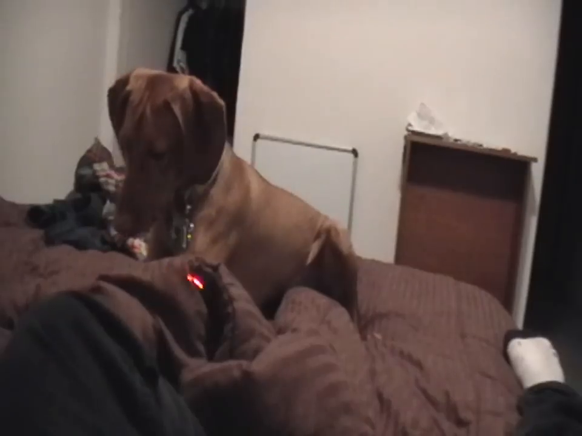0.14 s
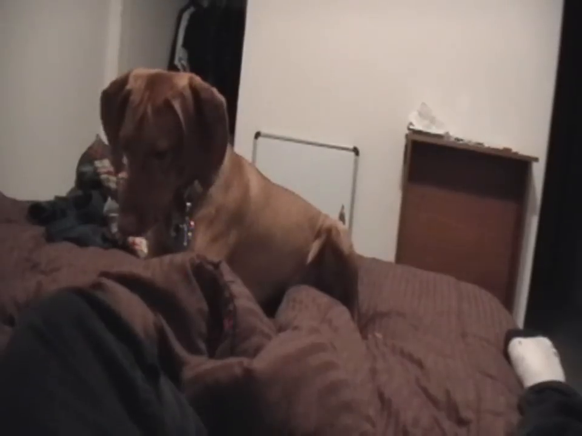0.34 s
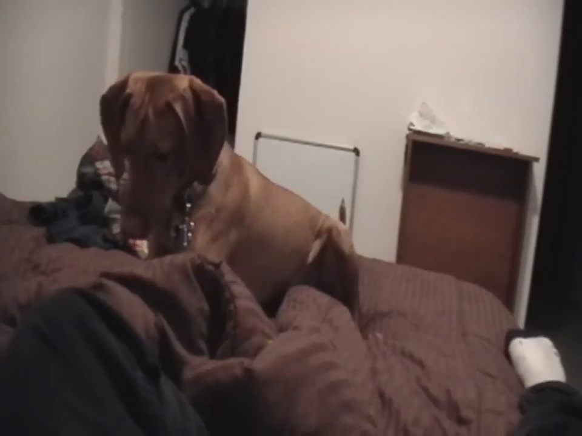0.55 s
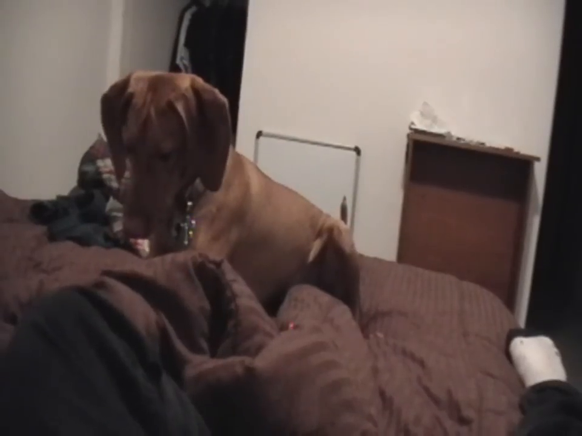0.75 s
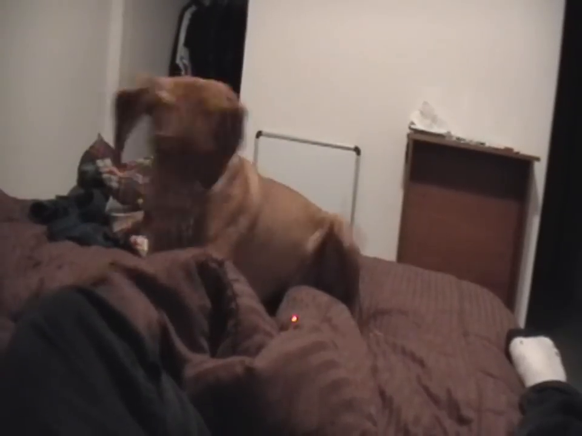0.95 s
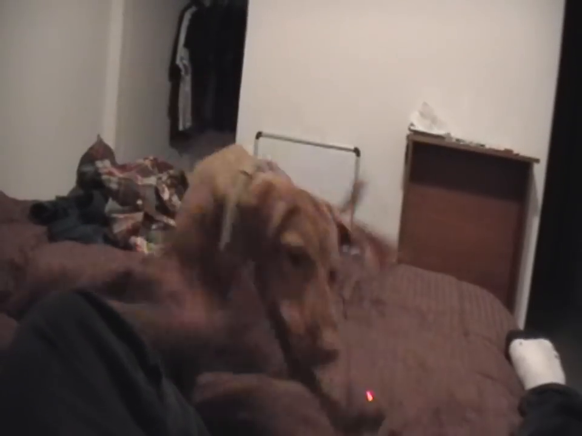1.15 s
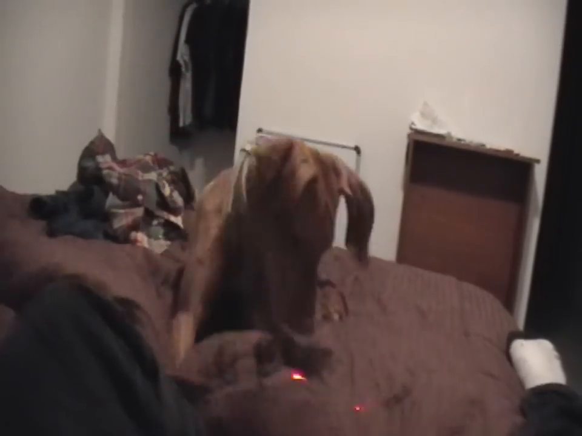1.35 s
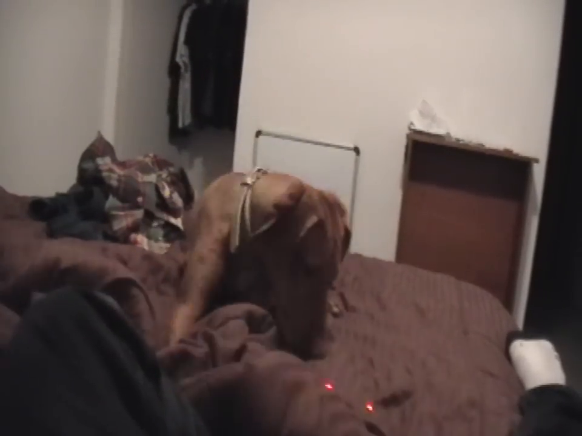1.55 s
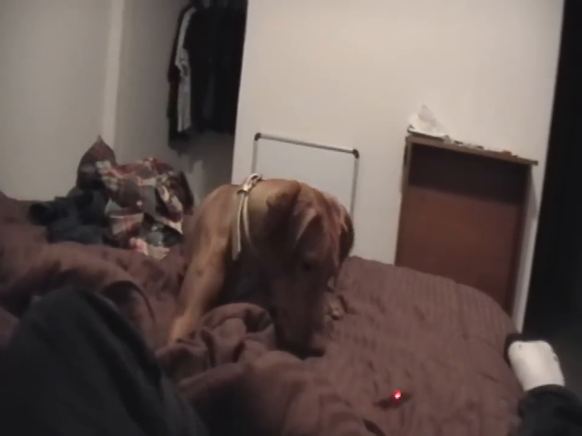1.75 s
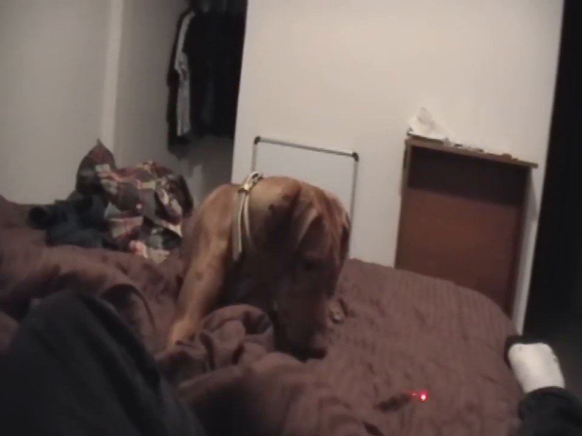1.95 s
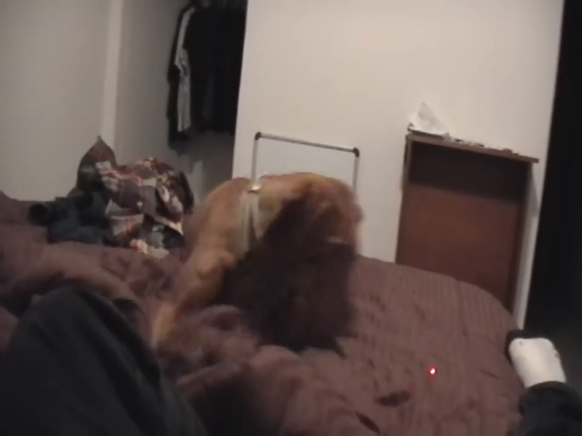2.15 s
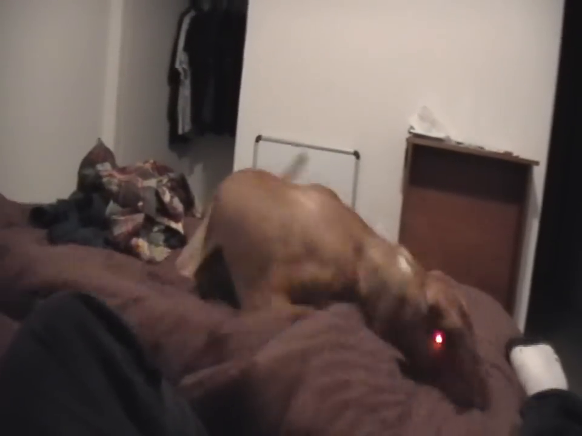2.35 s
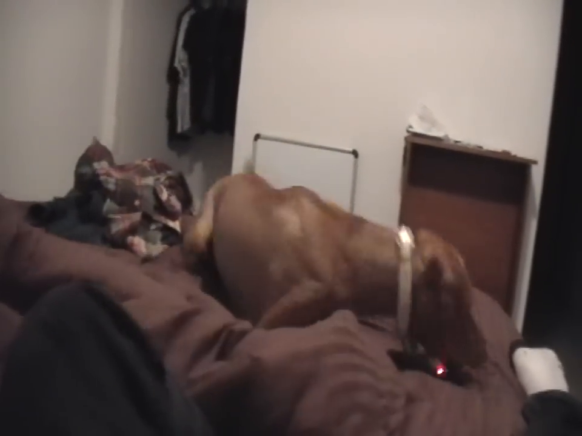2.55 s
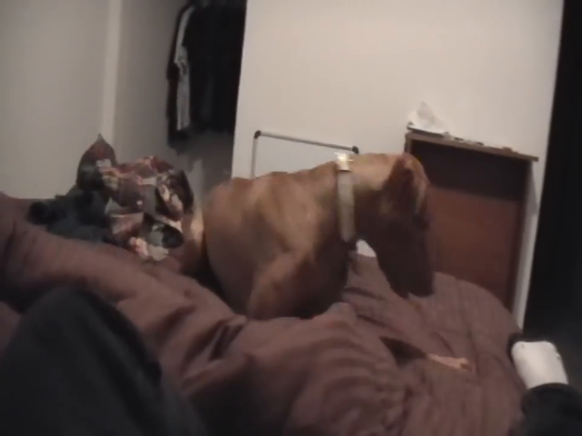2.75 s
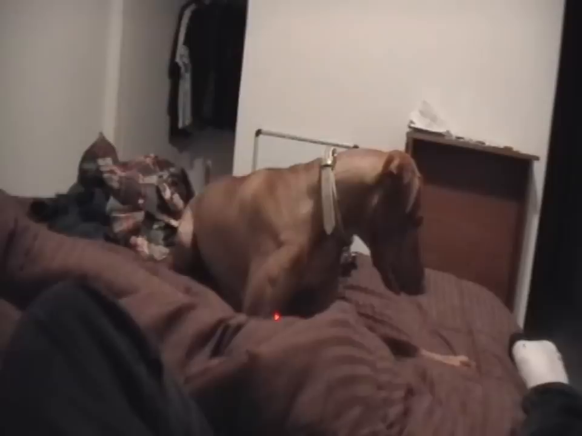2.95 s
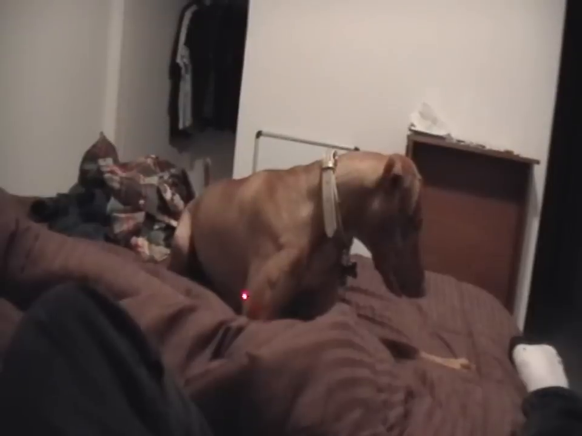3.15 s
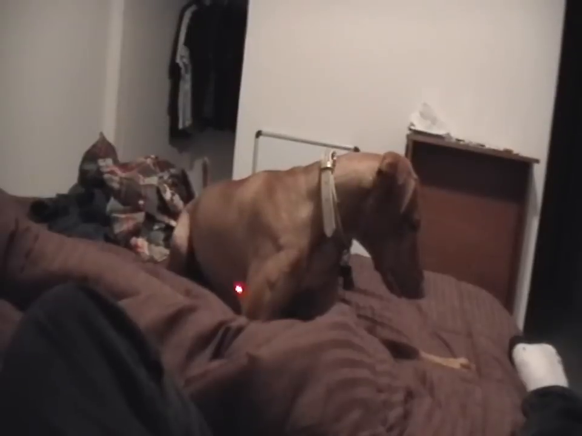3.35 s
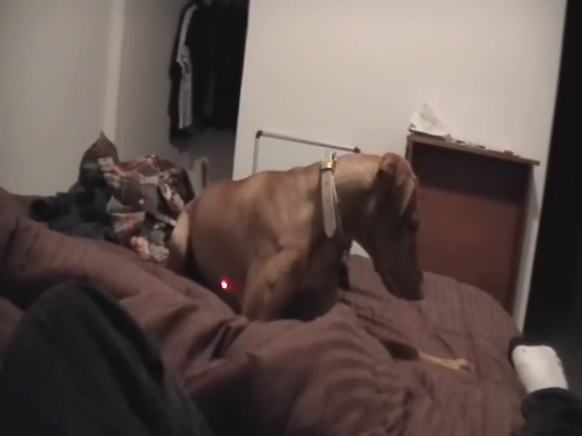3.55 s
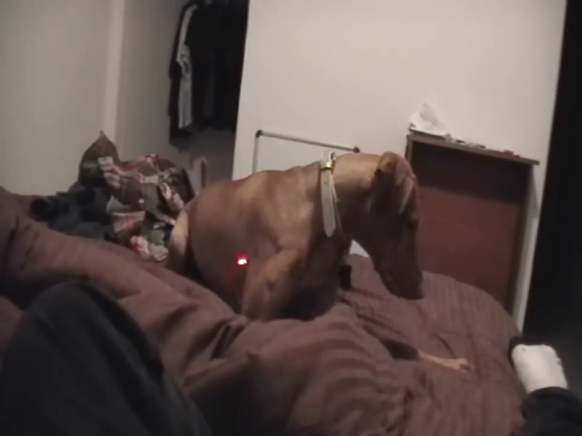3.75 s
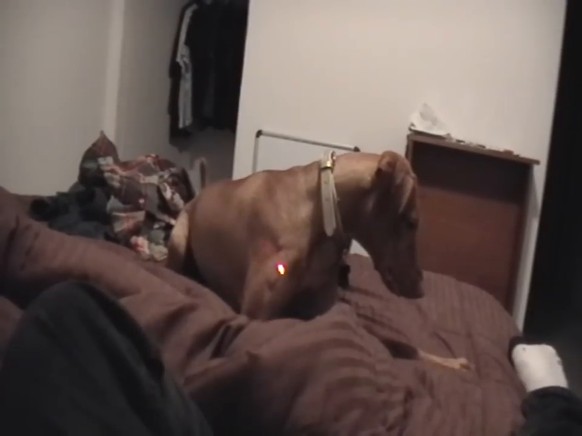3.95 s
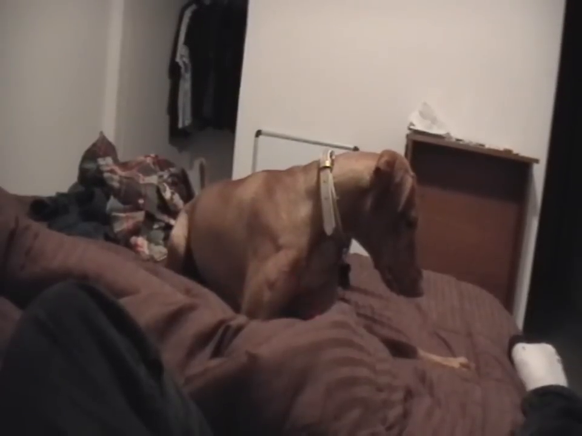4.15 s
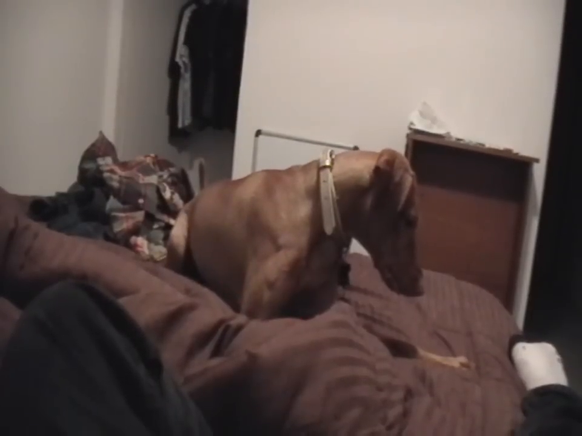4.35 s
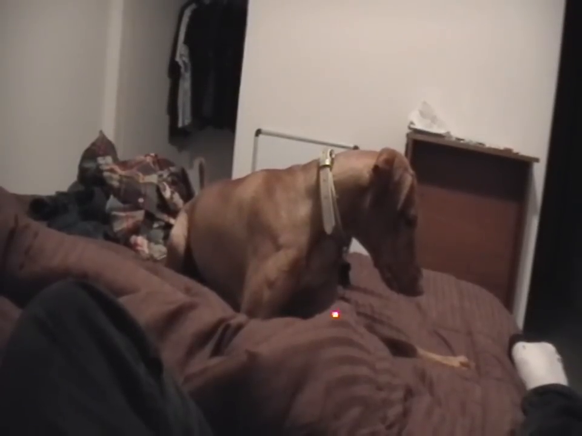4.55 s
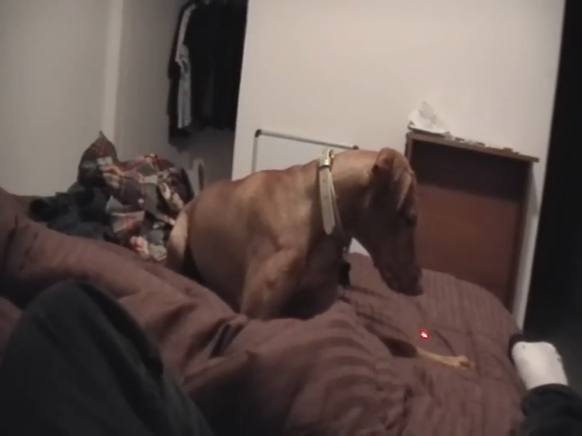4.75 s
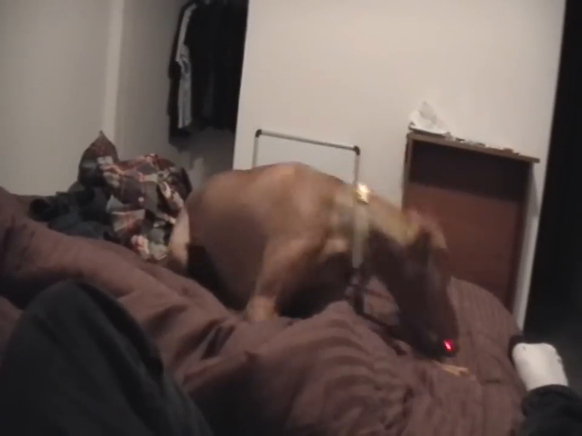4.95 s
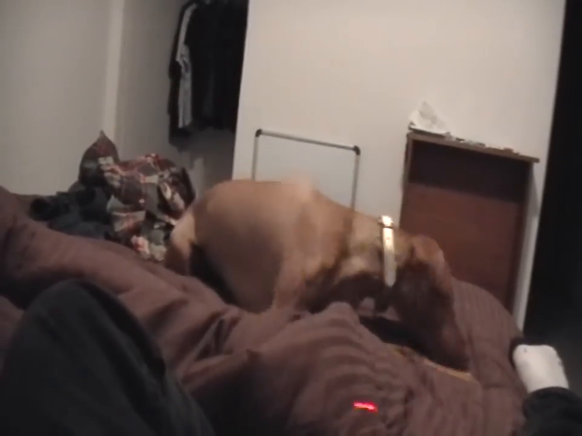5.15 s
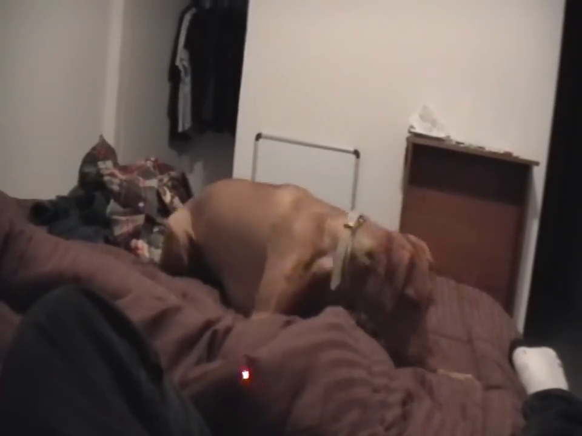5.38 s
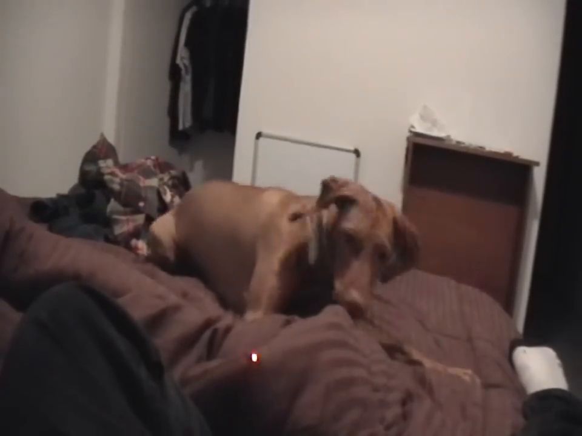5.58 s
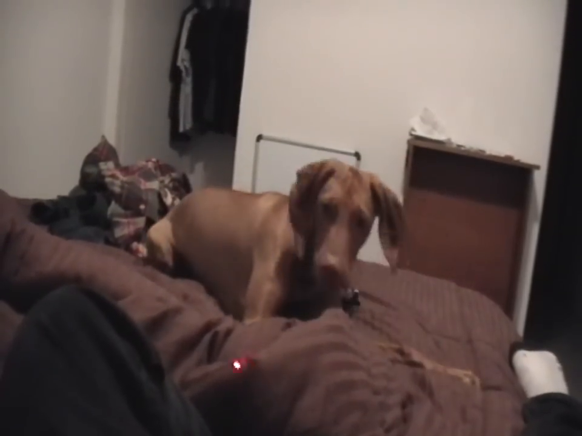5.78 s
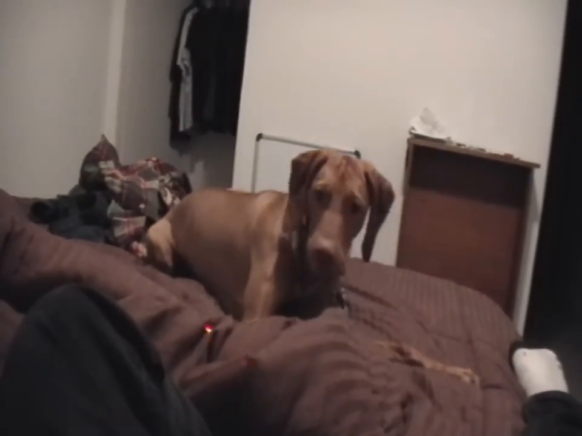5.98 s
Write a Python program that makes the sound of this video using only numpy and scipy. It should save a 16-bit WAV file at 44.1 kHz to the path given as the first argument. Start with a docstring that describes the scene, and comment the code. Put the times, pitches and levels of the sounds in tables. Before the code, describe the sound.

A dog's collar tags clink and chatter on and off over paw pats, duvet rustle and dull mattress thumps in a quiet bedroom.

```python
"""Two metal tags on a puppy's collar clash and chatter against their ring in short bursts.
Each hit makes a sharp click and leaves the tags ringing for a moment.
She is pouncing about on a bed in a small bedroom: her paws pat the duvet, the cloth rustles,
the mattress thuds and the bed rumbles, all over faint room noise and a steady hum.
At the very start comes a short hollow rush, then the sound drops out for an instant."""
import sys
import numpy as np
from scipy import signal
from scipy.fft import rfft, irfft, next_fast_len
from scipy.io import wavfile
from scipy.ndimage import uniform_filter1d

SR = 44100
rng = np.random.default_rng(int(sys.argv[2]) if len(sys.argv) > 2 else 0)


def transcribe(signal):
    """Save signal, clipped to [-1, 1], as a 16-bit WAV file at the path in sys.argv[1]."""
    frames = np.atleast_2d(signal).T
    limited = np.clip(frames, -1, 1)
    pcm = np.round(limited * 32767).astype(np.int16)
    wavfile.write(sys.argv[1], SR, pcm)


N = 265437  # about 6 seconds


def amp(db):
    """Turn decibels into a number to multiply by."""
    return 10 ** (np.asarray(db) / 20)


def unit(x):
    """Scale a sound to an average (rms) level of 1."""
    return x / np.sqrt(np.mean(x ** 2) + 1e-20)


def along(points, hz):
    """Read between (Hz, value) points on a logarithmic pitch scale."""
    point_hz, values = np.transpose(points)
    return np.interp(np.log(hz + 1), np.log(point_hz + 1), values)


def seconds(size):
    """The time of each sample."""
    return np.arange(size) / SR


def fade(t, t60):
    """Die away by 60 dB in t60 seconds, the fade time."""
    return amp(-60 * t / t60)


def add(track, start, sound):
    """Mix a sound into a track at a start time in seconds."""
    part = track[..., max(round(start * SR), 0):][..., :sound.shape[-1]]
    part += sound[..., :part.shape[-1]]


def filtered(x, response):
    """Turn each frequency up or down by response(hz)."""
    size = x.shape[-1]
    padded = next_fast_len(size + 2048)
    return irfft(rfft(x, padded) * response(np.fft.rfftfreq(padded, 1 / SR)), padded)[..., :size]


def coloured(x, colour, size=2048):
    """Give a sound a tone colour without smearing it back in time."""
    gains = amp(along(colour, np.fft.rfftfreq(size, 1 / SR)))
    cepstrum = irfft(np.log(gains + 1e-6))
    cepstrum[1:size // 2] *= 2  # move the filter's response to after the hit
    cepstrum[size // 2 + 1:] = 0
    response = irfft(np.exp(rfft(cepstrum)))
    return signal.fftconvolve(x, response / np.linalg.norm(response))[:len(x)]


def ringing(tones, t, scatter_db, detune):
    """The fading tones of a struck object; each blow lands elsewhere, so they vary a little."""
    hz, db, t60 = np.transpose(tones)[:, :, None]
    strength, shift, phase = rng.standard_normal((3, len(tones), 1))
    waves = np.sin(2 * np.pi * (hz * (1 + detune * shift) * t + phase))
    return np.sum(amp(db + scatter_db * strength) * waves * fade(t, t60), axis=0)


def ticks(per_second, spread_db, size=N):
    """Tiny ticks at random moments."""
    hits = rng.random(size) < per_second / SR
    return unit(hits * amp(spread_db * rng.standard_normal(size)) * rng.choice([-1, 1], size))


def swells(rows, rise_db_per_s, fall_db_per_s):
    """A loudness curve that builds to each (seconds, dB) peak and dies away."""
    peak_s, db = np.transpose(rows)[:, :, None]
    t = seconds(N) - peak_s
    below_peak_db = np.maximum(-rise_db_per_s * t, fall_db_per_s * t)
    return np.linalg.norm(amp(db - below_peak_db), axis=0)


# How alike left and right sound. Each row: frequency in Hz, likeness (1 means the same).
LIKENESS = [(150, 0.98), (500, 0.62), (1200, 0.13), (4800, 0.48), (7200, 0.36), (9000, 0.37), (12000, 0.18)]

def surrounding_noise(size):
    """Stereo hiss arriving from all sides."""
    def shares(hz):
        angle = np.arccos(np.clip(along(LIKENESS, hz), -1, 1)) / 2
        return np.array([np.cos(angle), np.sin(angle)])
    middle, side = filtered(rng.standard_normal((2, size)), shares)
    return np.array([middle + side, middle - side])


def rush(colour):
    """Steady noise from all sides with the given tone colour."""
    return unit(filtered(surrounding_noise(N), lambda hz: amp(along(colour, hz))))


# The bedroom's echo. Each row: frequency in Hz, fade time in seconds.
ECHO_FADES = [(150, 0.77), (1000, 0.32), (4000, 0.49), (8000, 0.36), (11500, 0.29), (14000, 0.18)]

def in_room(x, echo_db, build_s=0.0019):
    """Add the echo off the walls; its highest treble dies first."""
    hz, t, spectrum = signal.stft(surrounding_noise(SR // 2), SR, nperseg=256)
    echo = signal.istft(spectrum * fade(t, along(ECHO_FADES, hz)[:, None]), SR, nperseg=256)[1]
    echo *= 1 - np.exp(-(seconds(echo.shape[1]) / build_s) ** 2)
    echo *= amp(echo_db) / np.linalg.norm(echo[0])
    echo[:, 0] += 1  # the direct sound
    return signal.fftconvolve(x[None], echo, axes=1)[:, :N]


# The colour of the room noise. Each row: frequency in Hz, relative level in dB.
AIR_COLOUR = [(15, -55), (25, -34), (108, -5.5), (263, -12), (373, -8), (489, -28), (591, -12.5),
              (818, -22), (887, -18.5), (1740, -23), (11300, -43.5), (16000, -65.5)]
# The tones of the hum. Each row: pitch in Hz, relative level in dB.
HUM_TONES = [(118.4, -77), (376.8, -75), (845.2, -70.5), (1685, -75)]

def background():
    """Faint room noise and a hum of a few steady tones."""
    t = seconds(N)
    hum = sum(amp(db) * np.sqrt(2) * np.sin(2 * np.pi * (hz * t + rng.random())) for hz, db in HUM_TONES)
    return amp(-57.5) * rush(AIR_COLOUR) + amp(-3.5) * hum


# The colour of the opening rush. Each row: frequency in Hz, relative level in dB.
HOLLOW_COLOUR = [(60, -22), (250, -3), (500, -17), (740, 3), (920, 7.5), (1250, -8), (1700, -7.5),
                 (2500, -18), (12000, -28)]

def hollow_rush():
    """A short hollow rush of noise at the start."""
    return amp(-43) * (seconds(N) < 0.084) * rush(HOLLOW_COLOUR)


# Paws and snout brushing the cloth. Each row: time of the peak in seconds, relative level in dB.
STROKES = [(1.15, -42), (1.25, -38.5), (1.43, -40.5), (1.62, -48), (2.33, -45), (2.44, -38.5), (2.69, -45),
           (4.99, -47.5), (5.12, -49.5), (5.25, -54.5), (5.52, -57.5)]

def stroke_strength():
    """How hard she works the bedding at each moment."""
    return swells(STROKES, rise_db_per_s=213, fall_db_per_s=101.5)


# The colour of the rustle. Each row: frequency in Hz, relative level in dB.
CLOTH_COLOUR = [(80, -24.5), (180, -6), (380, 0.5), (500, -15), (760, 1), (1250, -9.5), (3400, -14.5),
                (4800, -22), (11500, -25), (15000, -44.5)]

def cloth_rustle():
    """Folds of cloth catch and slip many times a second as she strokes them."""
    catches = coloured(ticks(per_second=1700, spread_db=0.5), CLOTH_COLOUR)
    return in_room(amp(2) * stroke_strength() * catches, echo_db=-5)


# Her weight landing. Each row: start in seconds, relative level in dB, pitch in Hz, seconds to sink in.
THUDS = [(0.442, -31, 125.2, 0.011), (0.851, -26, 121.3, 0.049), (1.83, -31.5, 91.6, 0.014),
         (2.092, -32, 93.4, 0.012), (2.13, -30, 90.8, 0.012), (2.648, -26.5, 118.5, 0.0068),
         (4.123, -33, 121.6, 0.012), (4.599, -32.5, 109.3, 0.063)]
# The mattress's tones. Each row: multiple of the pitch, relative level in dB, fade time in seconds.
MATTRESS_TONES = [(.82, -10.5, 0.51), (1.002, 3.5, 0.24), (1.9, -11.5, 0.21), (2.7, -21, 0.098)]

def mattress_thuds():
    """Soft blows make the mattress ring at a pitch set by where they land."""
    out, t = np.zeros(N), seconds(SR // 2)
    for start, db, hz, sink_s in THUDS:
        sink = 1 - np.exp(-(t / sink_s) ** 2)
        tone = ringing(np.array(MATTRESS_TONES) * [hz, 1, 1], t, scatter_db=0.8, detune=0.015)
        add(out, start, amp(db + 0.1) * sink * tone)
    return out


# The colour of the rocking bed. Each row: frequency in Hz, relative level in dB.
RUMBLE_COLOUR = [(25, -32.5), (55, -15.5), (88, -1), (128, 5), (180, -11.5), (230, -9.5), (380, -17),
                 (490, -31.5), (700, -33.5), (1400, -65.5)]

def bed_rumble():
    """The bed rocks as she wags her tail, with every stroke and just after every landing."""
    t = seconds(N)
    wag_start_s, wag_end_s, wag_hz = 0.12, 1.25, 6.86
    rise, fall = 438, 89.5  # dB per second
    quieter_db = np.maximum(rise * (wag_start_s - t), fall * (t - wag_end_s)).clip(0)
    quiver_db = np.sin(2 * np.pi * wag_hz * (t - wag_start_s))
    wag = amp(-44 - quieter_db + quiver_db)
    landings = swells([(start + 0.029, db - 11) for start, db, *_ in THUDS], rise, fall)
    strokes = amp(-2.5) * stroke_strength()
    return np.linalg.norm([wag, landings, strokes], axis=0) * rush(RUMBLE_COLOUR)


# Paws hitting the duvet. Each row: start in seconds, relative level in dB.
PATS = [(1.207, -14.5), (1.234, -23.5), (1.288, -26.5), (1.600, -31.5), (2.41, -30), (2.439, -27.5),
        (2.685, -29.5), (4.988, -35.5)]
# The colour of a pat. Each row: frequency in Hz, relative level in dB.
PAT_COLOUR = [(60, -34), (130, -7), (270, -1.5), (440, -4.5), (505, -17), (700, -3), (950, -15),
              (1500, -17), (1900, -25), (4000, -31), (10000, -55.5)]

def paw_pats():
    """Each paw slaps a puff of air out of the duvet."""
    out, t = np.zeros(N), seconds(SR // 4)
    for start, db in PATS:
        onset = 1 - np.exp(-t / 0.0003)
        puff = rng.standard_normal(len(t)) * onset * fade(t, 0.19)
        add(out, start, amp(db - 4.5) * coloured(puff, PAT_COLOUR))
    return in_room(out, echo_db=-6.5)


# Knocks of the steel ring. Each row: start in seconds, level in dB, pitch in Hz.
CLINKS = [(1.099, -35.5, 4140), (1.341, -29, 3330), (2.371, -22.5, 3220), (2.378, -22.5, 3300),
          (2.386, -25, 3000), (2.869, -40.5, 3850)]

def ring_clinks():
    """The ring knocks on its collar loop, which holds it, so the clink dies almost at once."""
    out, t = np.zeros(N), seconds(SR // 10)
    for start, db, hz in CLINKS:
        add(out, start, amp(db) * np.sin(2 * np.pi * hz * t) * fade(t, 0.012))
    return in_room(out, echo_db=-4)


def clack(t, t60, count=9):
    """A metal click: a few very short tones that change with the spot that is hit."""
    hz = rng.uniform(2200, 15000, (count, 1))
    waves = np.sin(2 * np.pi * (hz * t + rng.random((count, 1))))
    click = waves.sum(axis=0) * fade(t, t60)
    return click / np.linalg.norm(click)


# The colour of metal hitting metal. Each row: frequency in Hz, relative level in dB.
CLASH_COLOUR = [(300, -38.5), (1500, -6.5), (2400, -7.5), (3200, -4), (5000, -4), (7500, 0), (9000, 1.5),
                (12000, 1), (13000, -5.5), (15000, -19.5)]
# The tags' high and low tones, brief because the tags muffle each other.
# Each row: pitch in Hz, relative level in dB, fade time in seconds.
HIGH_TAG_TONES = [(11410, -0.5, 0.066), (11440, 3.5, 0.065)]
LOW_TAG_TONES = [(4074, -24.5, 0.3), (6595, -8.5, 0.11), (6810, -2.5, 0.055), (6966, -1, 0.06),
                 (7060, -18.5, 0.51)]
# Swings of the collar. Each row: time of the peak in seconds, relative level in dB.
SWINGS = [(1.15, -48), (1.43, -48.5), (1.6, -45), (1.86, -56.5), (2.39, -38), (2.5, -41.5), (2.57, -41),
          (2.96, -61), (3.29, -60), (5.0, -57), (5.18, -45), (5.51, -46.5), (5.73, -48.5)]

def tag_chatter():
    """As the collar swings, tags and ring touch lightly at several spots, each with its own sound."""
    swing = swells(SWINGS, rise_db_per_s=283.5, fall_db_per_s=138.5)
    out, t = np.zeros(N), seconds(SR // 4)
    for spot in range(8):
        click = coloured(clack(t, t60=0.0058), CLASH_COLOUR)
        tone = ringing(HIGH_TAG_TONES + LOW_TAG_TONES, t, scatter_db=1, detune=0.004)
        touch = click / np.linalg.norm(click) + amp(-5.5) * tone / np.linalg.norm(tone)
        hits = swing * ticks(per_second=18, spread_db=0)
        out += signal.fftconvolve(hits, touch)[:N]  # one touch for every hit
    return in_room(amp(-6) * out, echo_db=-1)


# The clearest hits of tag on tag.
# Each row: start in seconds, then relative levels in dB of the click, the high tones and the low tones.
CLASHES = [(0.1057, -34, -47, -69), (1.053, -43.5, -72, -70), (1.1203, -29.5, -54, -41.5),
           (1.125, -33, -32, -55), (1.341, -30.5, -33, -34), (1.3587, -26.5, -29, -28),
           (1.4102, -35, -41, -43), (1.485, -31, -42.5, -33.5), (1.604, -37, -32, -37.5),
           (1.765, -53, -48, -41), (2.3435, -53, -66, -34), (2.367, -27.5, -33.5, -48),
           (2.3844, -25, -48, -45), (2.41, -28, -20, -36), (2.4314, -42, -26, -35),
           (2.5651, -30, -37, -41.5), (2.6302, -32, -25.5, -37), (2.912, -25.5, -55, -39),
           (2.9155, -37.5, -61, -40), (2.9261, -30.5, -56, -39), (3.0527, -36, -49, -51),
           (3.18, -46.5, -65, -45), (3.2494, -34.5, -22.5, -34.5), (3.2575, -38, -37, -32),
           (3.3326, -43.5, -57, -47), (3.4044, -44, -69, -52.5), (5.13, -45, -43, -50),
           (5.181, -37.5, -36, -51), (5.2306, -36, -41.5, -35.5), (5.466, -37.5, -44, -44),
           (5.5152, -31.5, -46, -38), (5.53, -33, -49, -35), (5.5512, -35, -33, -51),
           (5.6933, -42.5, -50, -55), (5.7736, -50, -51, -37), (5.9813, -49, -78, -72)]

def tag_clashes():
    """Each hit clicks, bounces in a brief buzz of edge on edge, and sets the tags ringing."""
    out, t = np.zeros((2, N)), seconds(SR // 2)
    build = 1 - np.exp(-t / 0.00094)  # the tags take a moment to ring fully
    for start, click_db, high_db, low_db in CLASHES:
        buzz = ticks(per_second=1600, spread_db=1, size=len(t)) * fade(t, 0.047)
        edge = clack(t, t60=0.0023, count=14) + amp(-7) * buzz / np.linalg.norm(buzz)
        click = amp(click_db + 20) * coloured(edge, CLASH_COLOUR)
        high = amp(high_db + 1.5) * ringing(HIGH_TAG_TONES, t, scatter_db=4, detune=0.0015)
        low = amp(low_db + 3) * ringing(LOW_TAG_TONES, t, scatter_db=0.5, detune=0.005)
        add(out, start, in_room(click + build * (high + low), echo_db=-1))
    return out


def scene():
    """Collar, bed and room together."""
    collar = tag_clashes() + tag_chatter() + ring_clinks()
    bed = paw_pats() + mattress_thuds() + bed_rumble() + cloth_rustle()
    return collar + bed + background() + hollow_rush()


def record(dry):
    """The sound drops out for an instant near the start, and the very highest treble is cut."""
    t, top_hz = seconds(N), 15300
    sound_on = (t < 0.083) | (t > 0.103)
    gate = uniform_filter1d(1.0 * sound_on, size=64)  # soften the edges of the gap
    return filtered(dry * gate, lambda hz: 1 / (1 + (hz / top_hz) ** 90))


dry = scene()
out = record(dry)
transcribe(out)
```